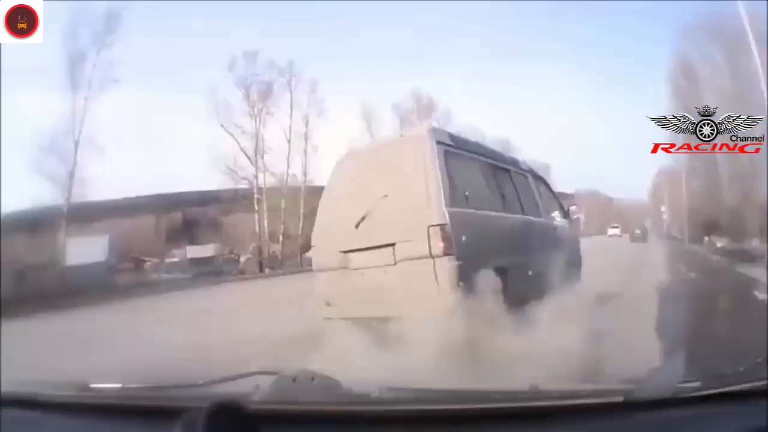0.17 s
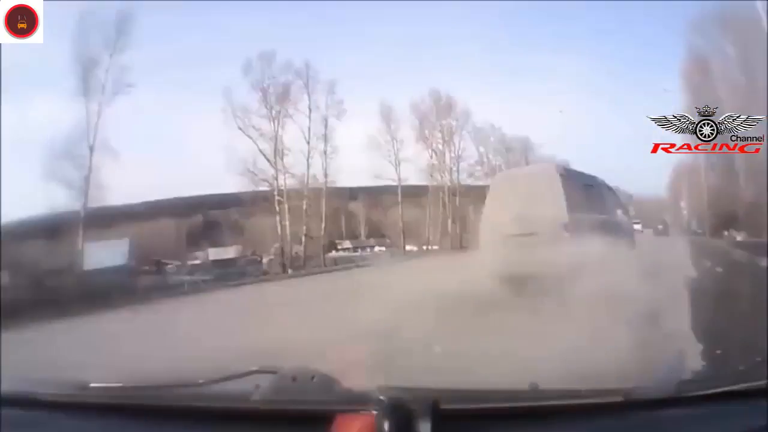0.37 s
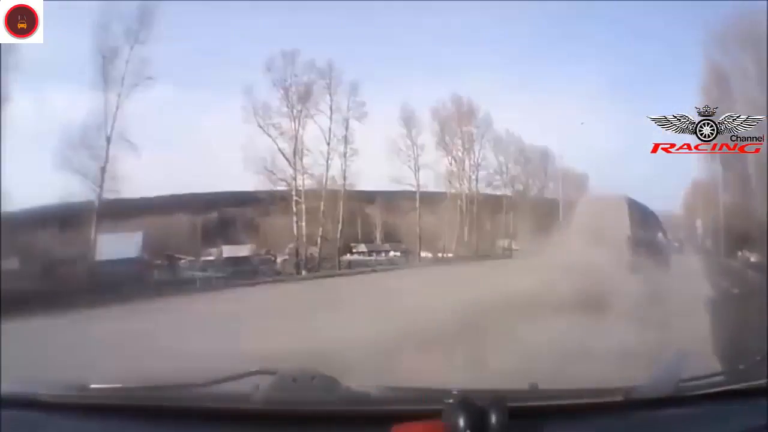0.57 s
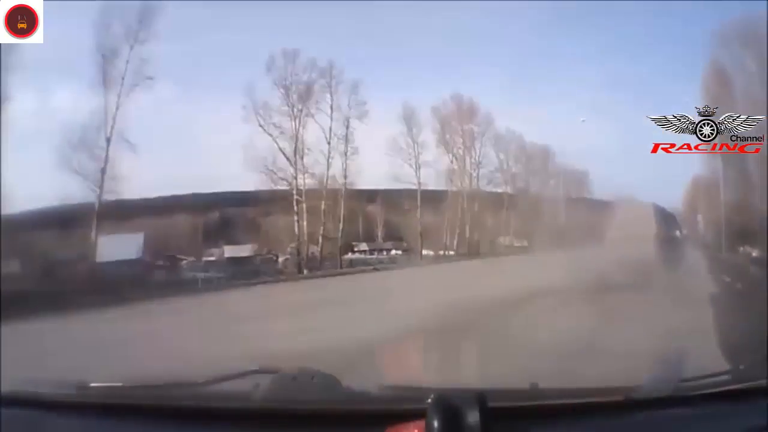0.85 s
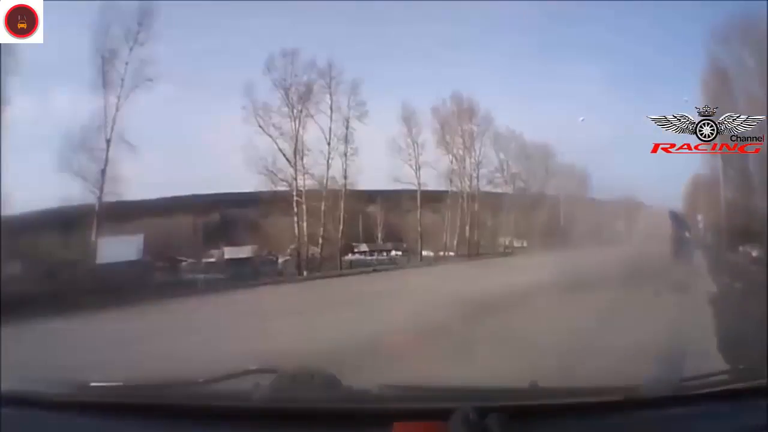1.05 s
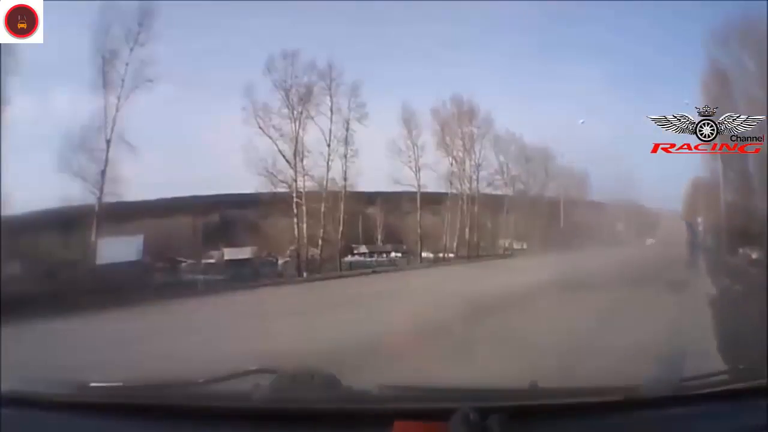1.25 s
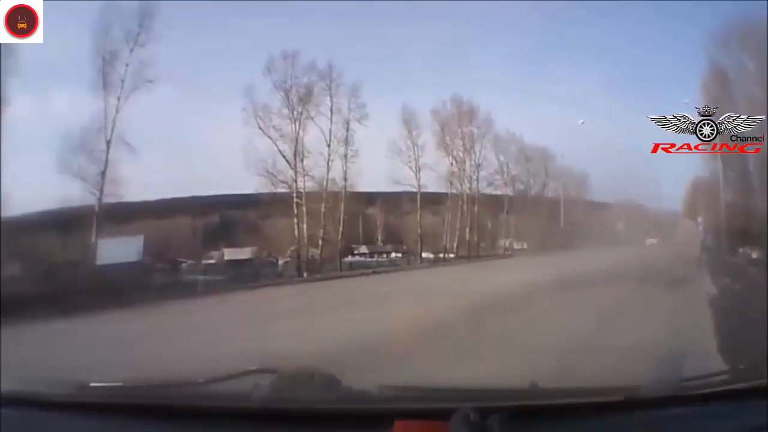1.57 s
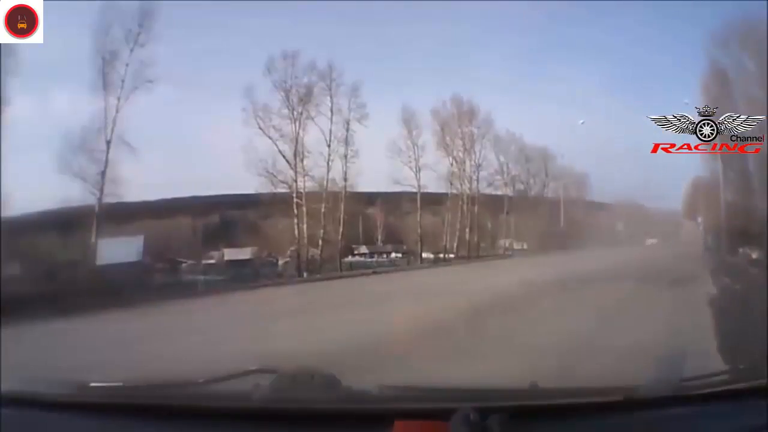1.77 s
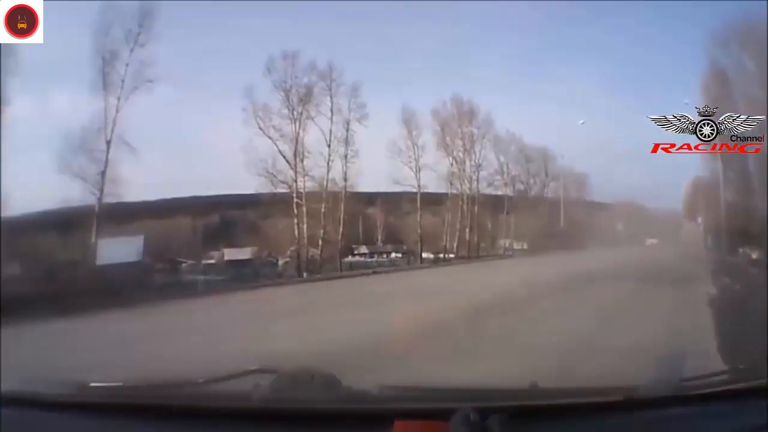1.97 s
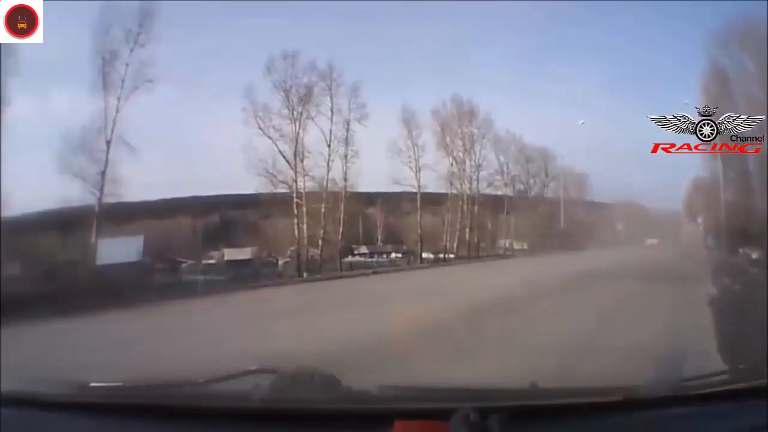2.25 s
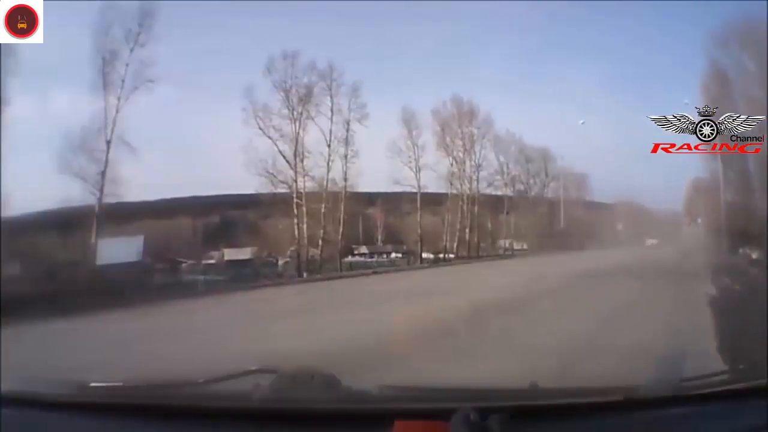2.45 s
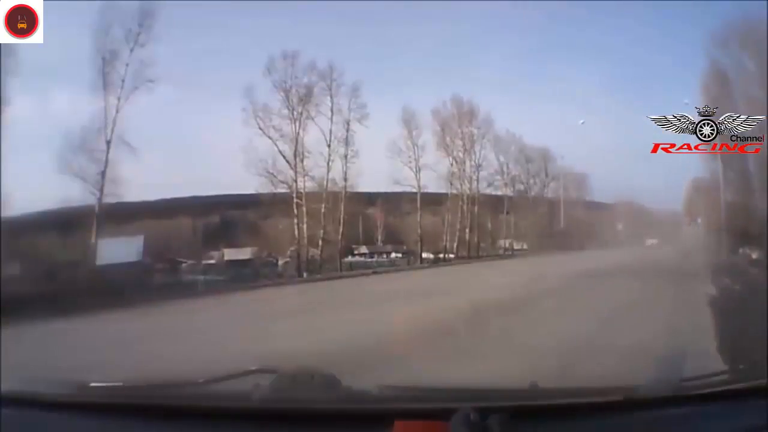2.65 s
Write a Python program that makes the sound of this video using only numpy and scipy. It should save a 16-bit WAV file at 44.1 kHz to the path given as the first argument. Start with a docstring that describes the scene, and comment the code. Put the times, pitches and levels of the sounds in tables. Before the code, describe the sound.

Violent vehicle collision slams and crumples, overloading the microphone, before loose parts clatter and the engine idles on.

```python
"""A car collision heard from inside: the body booms, panels crumple and trim tears until the input clips,
all of it made of coloured shot noise under level curves. Damped sines add deep swings of the shell.
Loose things knock (resonated noise bursts) and clink (chattering modes), with a short cabin tail.
Distant tyres squeal (a frequency-modulated tone blurred by noise), while the engine idles on in low
harmonic orders over patchy road and cabin noise."""
import sys
import numpy as np
from scipy import signal
from scipy.fft import rfft, irfft, next_fast_len
from scipy.io import wavfile
from scipy.ndimage import uniform_filter1d, map_coordinates

SR = 44100
rng = np.random.default_rng(int(sys.argv[2]) if len(sys.argv) > 2 else 0)


def to_wav(s):
    """Save 16-bit WAV."""
    ch = np.atleast_2d(s).T  # columns
    pcm = np.round(np.clip(ch, -1, 1) * 32767)  # PCM
    wavfile.write(sys.argv[1], SR, pcm.astype(np.int16))


def amplitude_ratio(level_db):
    """Convert a level in decibels to the matching linear amplitude (field) ratio."""
    exponent = np.asarray(level_db, float) / 20
    return 10 ** exponent


N = 123479
T = np.arange(N) / SR


def unit(x):
    """Normalise by the root mean square, so that the rms is 1."""
    return x / np.sqrt(np.mean(x ** 2) + 1e-20)


def curves(rows):
    """Linear interpolation in time: one value per sample for each column after the time."""
    s, *cols = np.transpose(rows)
    return [np.interp(T, s, c) for c in cols]


def wobble(rate):
    """Band-limited random modulation: a smooth curve through random knots, rate of them a second."""
    return map_coordinates(rng.standard_normal(int(3 * rate) + 4), [T * rate])


def colour(x, points):
    """Zero-phase spectral filter through (frequency [Hz], gain [dB]) points on a log frequency axis."""
    m = next_fast_len(N + 8192)
    f, db = np.transpose(points)
    log_hz = np.log(np.fft.rfftfreq(m, 1 / SR) + 1)
    gain = amplitude_ratio(np.interp(log_hz, np.log(f + 1), db))
    return irfft(rfft(x, m) * gain, m)[..., :N]


def ring(x, hz, q):
    """One causal second-order resonance of quality factor q."""
    return signal.lfilter(*signal.iirpeak(hz, q, SR), x)


def add(track, s, sound):
    """Linear superposition: mix a sound in at time s."""
    part = track[round(s * SR):][:len(sound)]
    part += sound[:len(part)]


def grainy(points, per_s, spread_db, smooth):
    """Shot noise: a coloured hail of uneven impulses plus a share of smooth noise, rms 1."""
    struck = rng.random(N) < per_s / SR
    strength = amplitude_ratio(spread_db * np.minimum(rng.exponential(size=N), 3.5))
    hail = struck * strength * rng.standard_normal(N)
    return unit(colour(unit(hail) + smooth * rng.standard_normal(N), points))


def crash():
    """Fracture and buckling as shot noise: the shell booms, panels buckle in lumps, trim and glass tear."""
    # force of the crash ahead of the overload:
    # (time [s], boom of the body [dB], crumpling panels [dB], tearing and shattering [dB])
    force = [(0, -29.5, -16, -67), (.04, -13, -17.5, -45), (.09, -20.5, -22.5, -20), (.115, 0.5, 5, -7.5),
             (.17, -2, 3.5, 3), (.22, -1, 6, 1.5), (.3, 2, 3.5, -6), (.36, -2, -1.5, -3),
             (.395, -11, -5, -9.5), (.425, -6, -13.5, -19.5), (.47, -20, -14, -17),
             (.53, -17, -21.5, -21.5), (.7, -19, -23, -19.5), (.95, -19, -19.5, -25),
             (1.05, -27.5, -32, -33), (1.2, -32, -27, -25), (1.26, -18.5, -18.5, -42),
             (1.33, -25, -26.5, -48), (1.5, -35, -27, -53), (1.57, -34.5, -35.5, -46.5),
             (2.15, -38, -47, -54), (2.8, -58, -42, -59)]
    # spectra of the three layers: (frequency [Hz], relative density [dB per Hz])
    boom_spectrum = [(12, -28.5), (30, -9.5), (60, -1), (110, -3), (170, -3.5), (400, -51.5)]
    panel_spectrum = [(70, -41.5), (150, 1), (350, -0.5), (600, -6), (1100, -9.5), (1600, -16.5),
                      (3000, -51)]
    shard_spectrum = [(500, -25.5), (850, -8), (1100, 2.5), (1500, -3), (2200, -11.5), (2580, 0.5),
                      (2950, -12.5), (3400, -2.5), (3900, -16.5), (4500, -12), (5000, -16), (5500, -16.5),
                      (6800, -34.5)]
    boom_db, panels_db, shards_db = curves(force)
    boom = grainy(boom_spectrum, per_s=60, spread_db=1.5, smooth=1.55)
    boom = amplitude_ratio(boom_db + 1.37 * wobble(15.6)) * boom
    panels = grainy(panel_spectrum, per_s=700, spread_db=3.5, smooth=0.87)
    panels = amplitude_ratio(panels_db + 2.5 * wobble(44.63)) * panels
    shards = grainy(shard_spectrum, per_s=1400, spread_db=3, smooth=1.0)
    shards = amplitude_ratio(shards_db + 2.46 * wobble(60.56)) * shards
    return boom + panels + shards


def idle():
    """Harmonics of the firing rate, slightly unsteady, over patchy noise modulated by the firing."""
    # strongest engine order, twice the firing rate: (time [s], frequency [Hz])
    strongest_order = [(1.55, 58.6), (2.704, 57.86), (2.734, 63), (2.8, 65)]
    # engine orders: (multiple of firing rate [1], rms level [dB])
    orders = [(1, -33.5), (2, -31), (3, -45.5), (4, -46), (5, -49.5), (6, -63.5)]
    # road and cabin noise: (frequency [Hz], relative density [dB per Hz])
    floor_spectrum = [(53, -21.5), (90, -6), (351, -4), (377, -4.5), (493, -2.5), (569, -9), (859, -10),
                      (1070, -15.5), (4380, -30), (6500, -34.5), (8450, -82), (14300, -120)]
    floor_db = -38
    phase = np.pi * np.cumsum(curves(strongest_order)[0]) / SR  # turns once per firing
    engine = np.zeros(N)
    for k, db in orders:
        level = np.sqrt(2) * amplitude_ratio(db + 2.5 * wobble(27))
        engine += level * np.cos(k * phase + 0.9 * wobble(8.7))
    noise = grainy(floor_spectrum, per_s=900, spread_db=1.0, smooth=2.74)
    noise_level = amplitude_ratio(floor_db + 0.8 * wobble(4.4) + 0.43 * np.cos(phase))
    return engine + noise_level * noise


def knocks():
    """Forced resonance: each rough contact drives the object's main mode, a bright edge and the dashboard."""
    # loose objects: (time [s], level [dB], pitch [Hz], contact length [s], edge level over body [dB])
    contacts = [(.004, -17.5, 470, 0.008, -19), (.047, -26, 2700, 0.018, -3.5),
                (.1, -2.5, 392, 0.0057, -16), (.108, 5, 367, 0.027, -11.5), (0.414, -3.5, 590, 0.002, -21),
                (0.446, -12, 500, .008, -1.5), (0.502, -10.5, 340, 0.0047, -9), (0.54, 3, 1283, .014, -7.5),
                (0.567, -12.5, 1040, 0.0066, -32), (0.58, 1.5, 1050, .007, -19),
                (0.6, -5.5, 1090, 0.011, -9), (0.621, -2.5, 833, 0.01, -25),
                (0.708, -13, 926, 0.023, -12.5), (0.771, -13.5, 1334, 0.022, -1.5),
                (0.793, -8, 1345, 0.01, -2), (0.922, -10.5, 1220, 0.0044, -62),
                (0.944, -21.5, 350, .01, -36.5), (0.998, -15.5, 1444, 0.004, -1),
                (1.042, -24.5, 507, 0.0047, -31), (1.097, -21, 333, 0.011, -8.5),
                (1.214, -20, 1490, 0.0049, -19.5), (1.235, -15, 863, 0.0056, -12),
                (1.254, -6, 1275, 0.0032, -11), (1.258, -7.5, 1120, 0.0044, -15),
                (1.283, -18, 830, 0.029, -12), (1.344, -25.5, 1070, .008, -27),
                (1.365, -23, 466, 0.023, -20.5), (1.399, -24.5, 1375, 0.043, 1.5),
                (1.488, -24, 405, 0.029, -38), (1.499, -40.5, 1204, .03, -18.5),
                (1.631, -23.5, 950, 0.016, -27), (1.644, -35, 1500, .01, -23),
                (1.741, -27.5, 315, 0.028, -26), (1.748, -33.5, 1100, 0.014, -32),
                (1.782, -29.5, 1240, 0.0084, -2), (2.043, -32.5, 347, 0.023, -10.5)]
    attack_s, strike_db, strike_s = 0.0004, 4, 0.003  # rise, then an extra level that dies away
    decay_t60, body_q = 0.061, 2.2
    edge_hz, edge_q = 2650, 2
    dash_hz, dash_q, dash_db = 568, 5, -6.5  # the dashboard answers every knock
    out, t = np.zeros(N), T[:SR // 6]
    lumps = amplitude_ratio(2 * wobble(300))  # unevenness of the contacts
    for s, db, hz, length, edge_db in contacts:
        body_force, edge_force, dash_force = rng.standard_normal((3, len(t)))
        attack = np.minimum(t / attack_s, 1)
        strike = strike_db * np.exp(-t / strike_s)
        decay = -60 * np.maximum(t - length, 0) / decay_t60
        shape = attack * amplitude_ratio(strike + decay)
        # the main resonance rings twice over
        body = unit(ring(ring(body_force, hz, body_q), hz, body_q / 2))
        edge = unit(ring(edge_force, edge_hz, edge_q))
        dash = unit(ring(dash_force, dash_hz, dash_q))
        add(out, s, amplitude_ratio(db) * shape * (body + amplitude_ratio(edge_db) * edge + amplitude_ratio(dash_db) * dash))
    return out * lumps


def clinks():
    """Modal synthesis: a first blow and a weaker chatter excite the same damped modes, each with a tick."""
    # small hard objects: (time [s], level [dB], chatter length [s], ring t60 [s])
    impacts = [(0.039, -43, .012, .03), (0.361, -11, .008, 0.01), (0.436, -12, .03, 0.011),
               (0.521, -23, .003, 0.024), (0.525, -12, .005, 0.025), (0.67, -11, .003, 0.026),
               (0.797, -22.5, .01, 0.092), (1.003, -32, .012, 0.015), (1.08, -36, .105, 0.012),
               (1.403, -16, 0.038, 0.031), (1.466, -36.5, .015, 0.023), (1.586, -39, .003, 0.048),
               (1.787, -18, .008, 0.013), (1.836, -27, .003, 0.061), (2.04, -33.5, .004, .03),
               (2.108, -44, .003, 0.028)]
    # their modes: (frequency [Hz], level [dB])
    hard_modes = [(3354, -4), (3784, -17), (4210, -23), (4500, -1.5), (4689, -14), (5426, -6), (6336, -11)]
    chatter_per_s, chatter_db = 1100, -3
    tick_db, tick_t60 = 1, 0.006
    out, t = np.zeros(N), T[:SR // 8]
    for s, db, length, t60 in impacts:
        chance = rng.random(len(t))
        strength, hiss = rng.standard_normal((2, len(t)))
        mode_offsets_db = rng.normal(0, 3.2, len(hard_modes))
        chatter = (chance < chatter_per_s / SR) * (t < length) * strength * amplitude_ratio(chatter_db)
        blows = chatter + (t == 0)
        modes = np.zeros(len(t))
        for (hz, level), offset_db in zip(hard_modes, mode_offsets_db):
            modes += amplitude_ratio(level + offset_db - 60 * t / t60) * np.sin(2 * np.pi * hz * t)
        tick = amplitude_ratio(tick_db - 60 * t / tick_t60) * hiss
        add(out, s, amplitude_ratio(db) * signal.fftconvolve(blows, modes + tick))
    return out


def cabin(x):
    """Reverberation by convolution with a short, dull, exponentially decaying noise tail."""
    t60, tail_db = 0.16, -16
    t = T[:SR // 4]
    tail = ring(rng.standard_normal(len(t)), 1100, 0.28) * amplitude_ratio(-60 * t / t60)
    tail = tail * (t > 0.002)  # leaves the direct sound clear
    return x + amplitude_ratio(tail_db) * signal.fftconvolve(x, tail / np.linalg.norm(tail))[:N]


def swings():
    """Free damped oscillation: the whole shell swings deeply after the heaviest blows."""
    # swings: (time [s], level [dB], frequency [Hz], t60 [s])
    oscillations = [(.205, 7.5, 51.9, 0.34), (.25, 12, 67.8, .3), (.3, 10, 66, .25), (.31, 4, 102.1, 0.31),
                    (.405, -5.5, 62, 0.28)]
    out, t = np.zeros(N), T[:SR // 2]
    for s, db, hz, t60 in oscillations:
        add(out, s, amplitude_ratio(db - 60 * t / t60) * np.sin(2 * np.pi * hz * t))
    return out


def squeal():
    """Frequency modulation: skidding rubber sings a quickly wavering tone, blurred by complex noise."""
    # tyres of the other car: (time [s], pitch [Hz], level [dB], waver before its share is taken [Hz])
    skid = [(.4, 1006, -20.5, 33.7), (.55, 973, -13, 32.2), (.75, 944, -25.5, 42), (.8, 890, -14, 9.5),
            (.88, 890, -20, 14.5), (.92, 1043, -41.5, 17.1), (1.0, 1080, -26.5, 14.6),
            (1.12, 1050, -21.5, 17.3), (1.2, 1048, -29.5, 33.3), (1.5, 1290, -35.5, 61),
            (1.6, 1274, -44.5, 31), (1.88, 1170, -40.5, 69), (1.91, 1176, -40, 65), (2.05, 1174, -44.5, 65),
            (2.16, 1192, -44, 70), (2.27, 1193, -43, 81), (2.32, 1230, -53.5, 62), (2.8, 1242, -51, 70)]
    waver_share, blur_share = 0.35, 1.6
    blur_rate = 160  # random knots a second
    hz, db, waver = curves(skid)
    deviation = waver_share * waver * (wobble(150) + 1.206 * wobble(22))
    phase = 2 * np.pi * np.cumsum(hz + deviation) / SR
    # the blur grows with the waver
    blur = blur_share * (wobble(blur_rate) + 1j * wobble(blur_rate)) * waver / waver.max()
    level = amplitude_ratio(db + 2 * wobble(70)) * (T > 0.38)
    return level * np.imag((1 + blur) * np.exp(1j * phase))


def scene():
    """Superposition of all sources at one microphone, copied to both channels."""
    loose = cabin(knocks() + clinks())
    mono = crash() + swings() + loose + squeal() + idle()
    return np.array([mono, mono])


def roll_off(x):
    """The treble ends steeply here."""
    return signal.sosfilt(signal.butter(12, 15680, fs=SR, output="sos"), x)


def record(dry):
    """Saturation: a narrow microphone clips its input, with a little leak, then a filter; a fuzz rides on the
    loud passages."""
    # response ahead of the overload: (frequency [Hz], gain [dB])
    mic_response = [(4, -13.5), (20, -1), (5600, -3), (6600, -14), (7500, -91), (20000, -74)]
    # response after the overload: (frequency [Hz], gain [dB])
    output_response = [(3, -12.5), (12, 1.5), (200, -0.5), (1200, 1), (5200, -2), (7000, -9.5), (15000, -7)]
    # fuzz on loud passages: (frequency [Hz], relative density [dB])
    grit_spectrum = [(30, -35), (300, -13), (1500, -3), (4000, -8), (6000, -8.5), (7500, -21)]
    ceiling, hardness = 0.71, 10.6
    leak_db, grit_db, offset = -39.5, -17.5, 0.0038
    x = colour(dry, mic_response)
    clipped = x / (1 + np.abs(x / ceiling) ** hardness) ** (1 / hardness)
    x = clipped + amplitude_ratio(leak_db) * x
    power = uniform_filter1d(x ** 2, size=300)  # the fuzz follows the short-term power
    x = x + amplitude_ratio(grit_db) * power * unit(colour(rng.standard_normal(N), grit_spectrum))
    x = colour(x, output_response + [(15680, -18), (15740, -90)])  # steep upper band edge
    x = x + offset
    return roll_off(np.clip(x, -1, 1))


dry = scene()
out = record(dry)
to_wav(out)
```